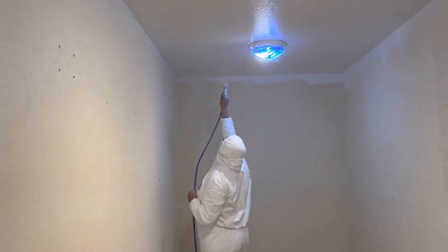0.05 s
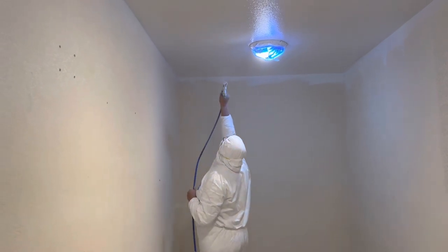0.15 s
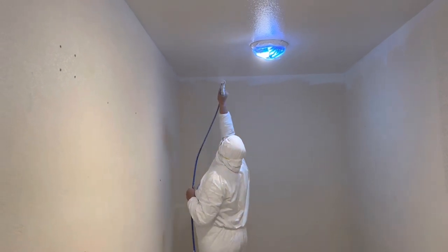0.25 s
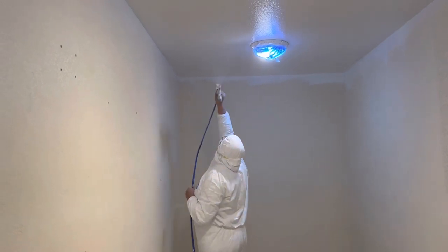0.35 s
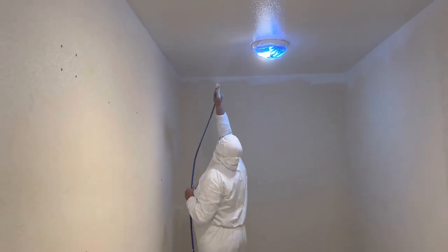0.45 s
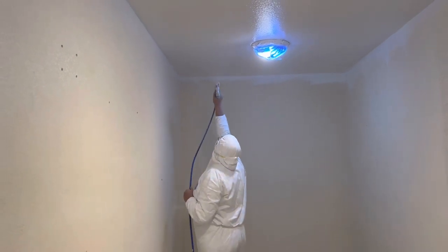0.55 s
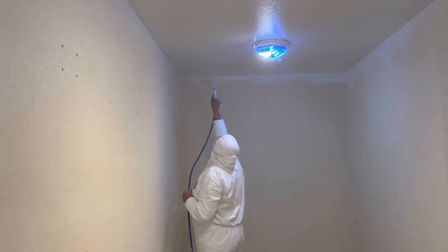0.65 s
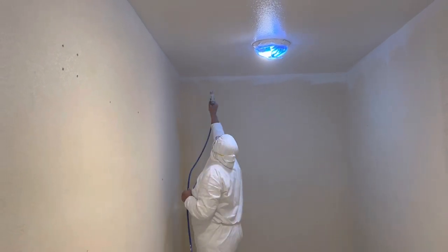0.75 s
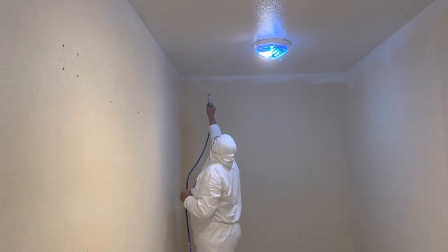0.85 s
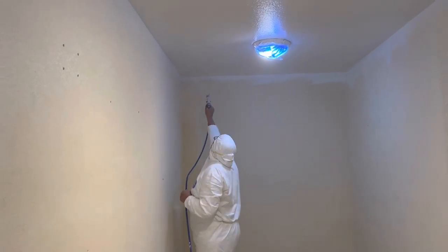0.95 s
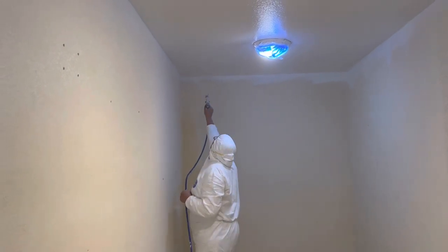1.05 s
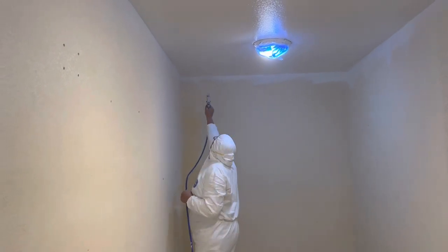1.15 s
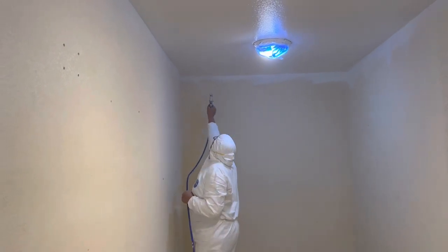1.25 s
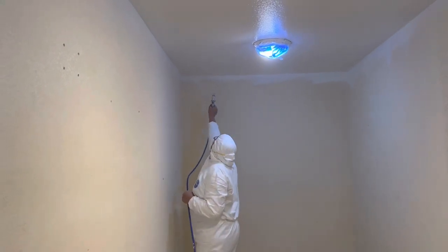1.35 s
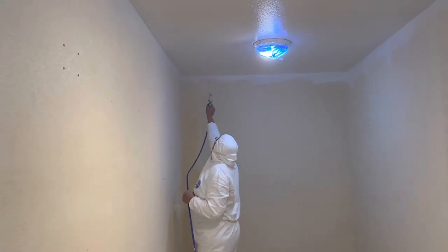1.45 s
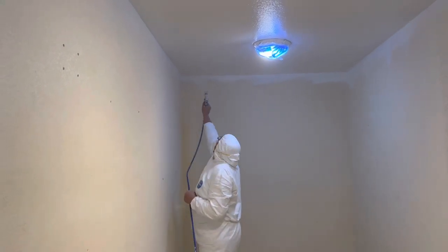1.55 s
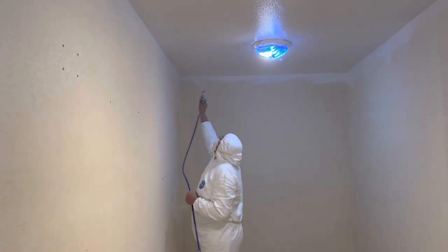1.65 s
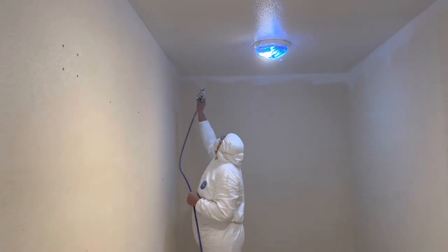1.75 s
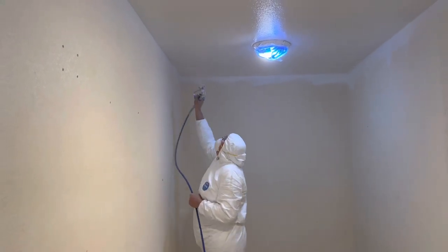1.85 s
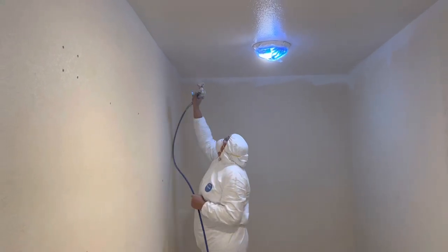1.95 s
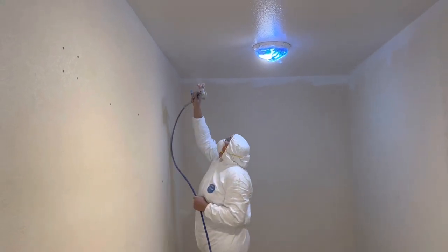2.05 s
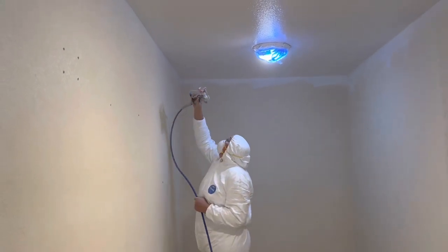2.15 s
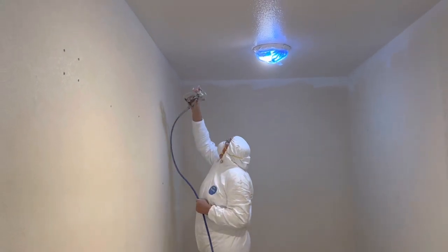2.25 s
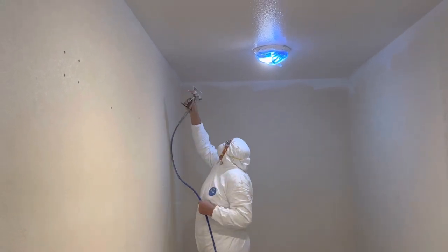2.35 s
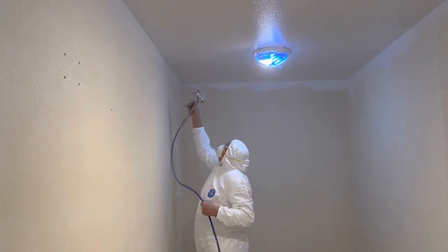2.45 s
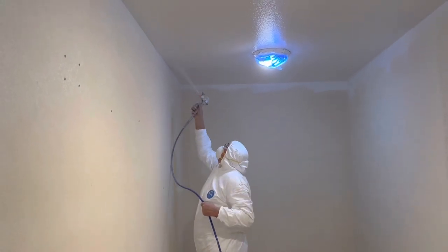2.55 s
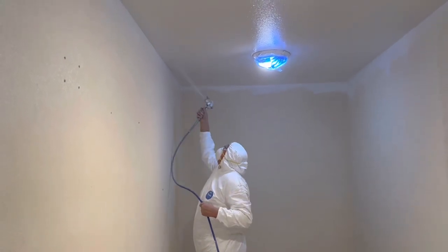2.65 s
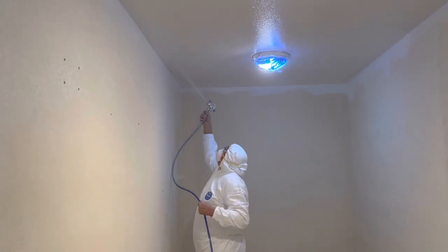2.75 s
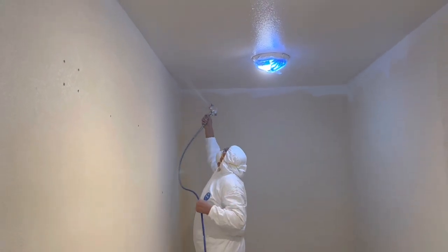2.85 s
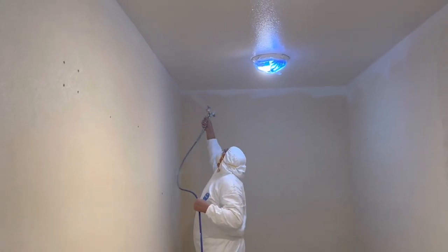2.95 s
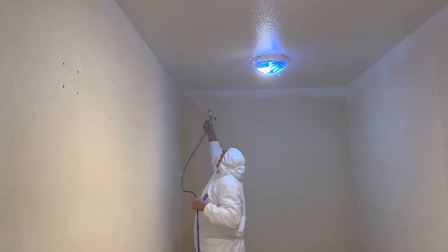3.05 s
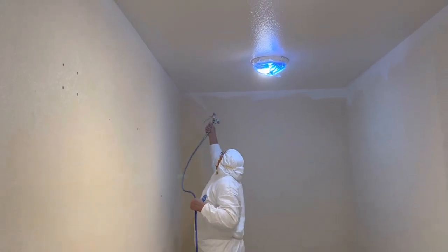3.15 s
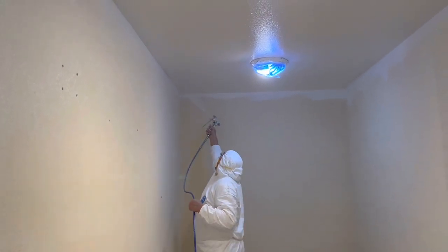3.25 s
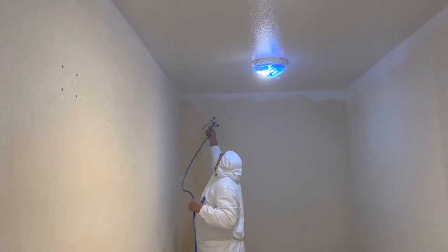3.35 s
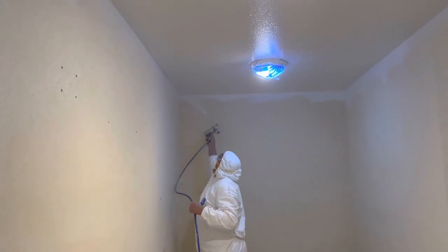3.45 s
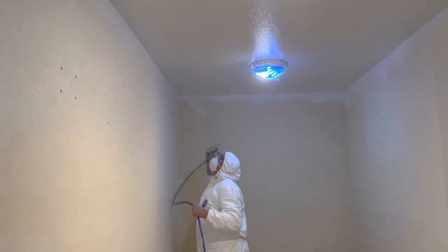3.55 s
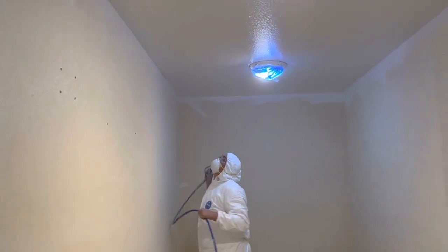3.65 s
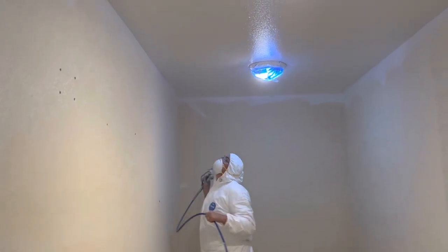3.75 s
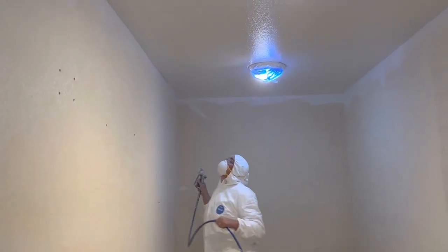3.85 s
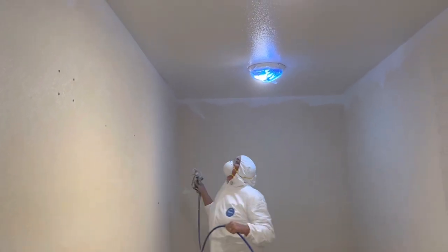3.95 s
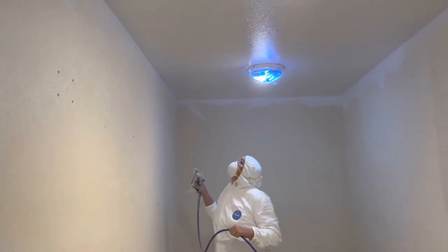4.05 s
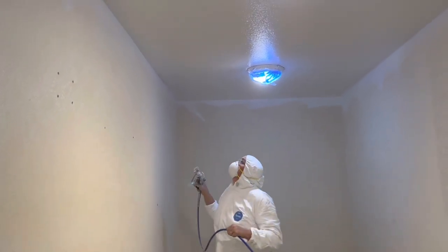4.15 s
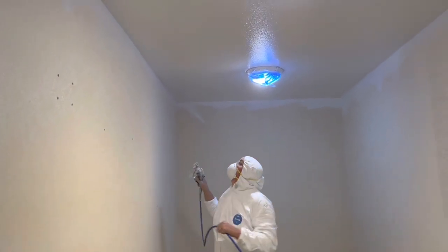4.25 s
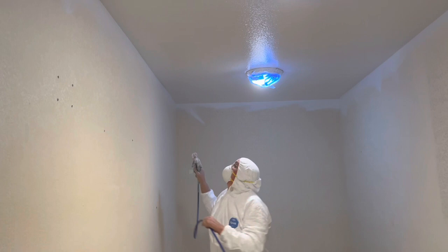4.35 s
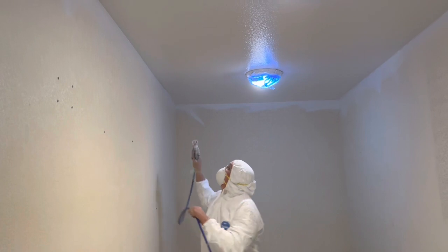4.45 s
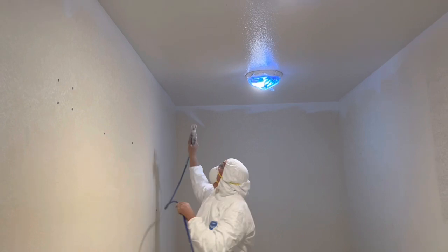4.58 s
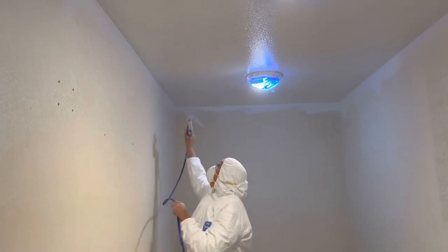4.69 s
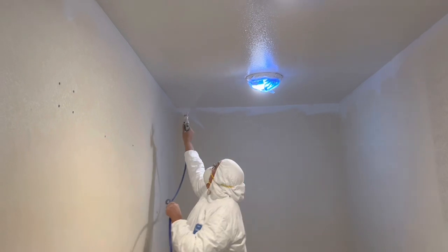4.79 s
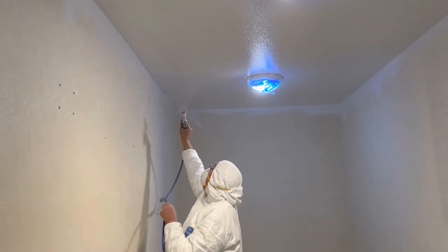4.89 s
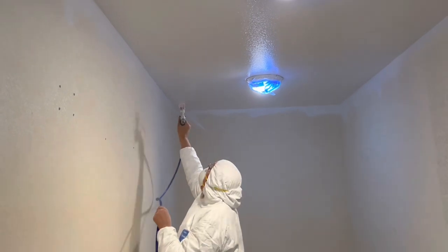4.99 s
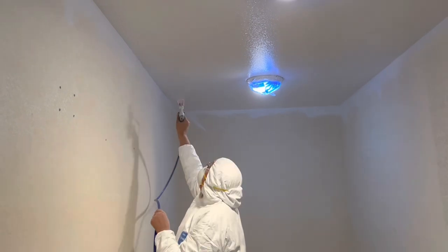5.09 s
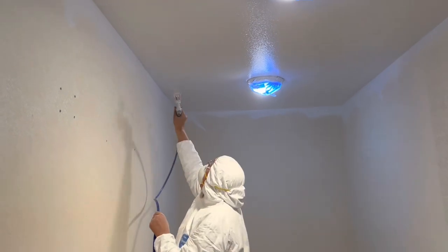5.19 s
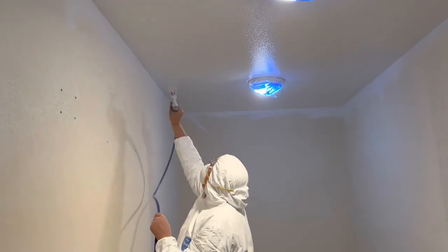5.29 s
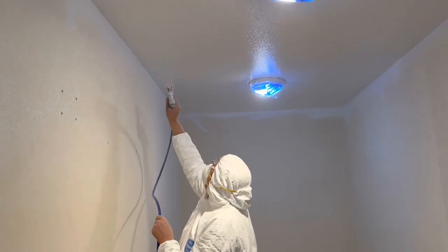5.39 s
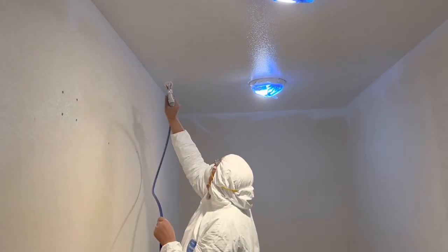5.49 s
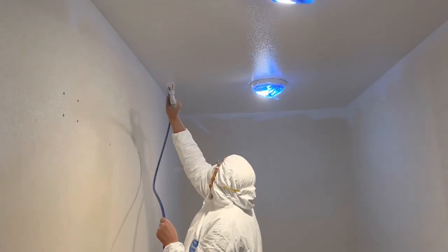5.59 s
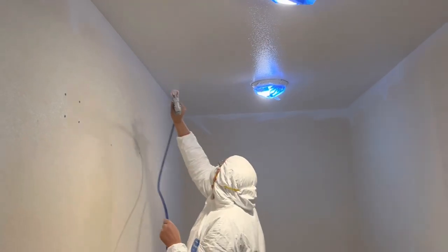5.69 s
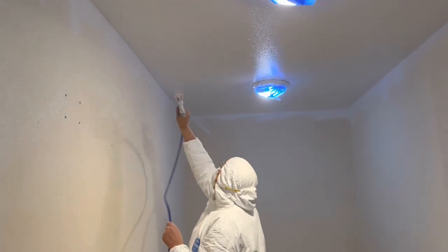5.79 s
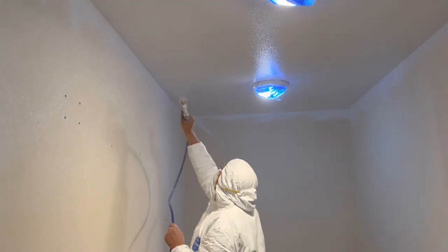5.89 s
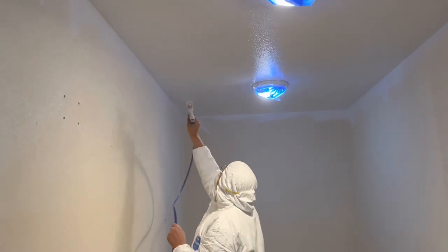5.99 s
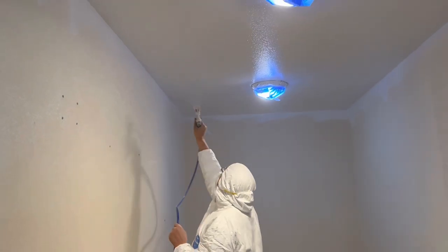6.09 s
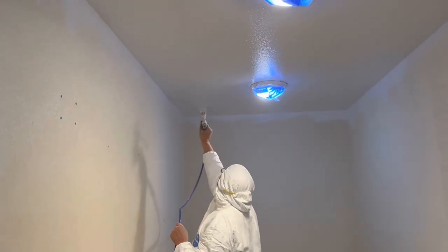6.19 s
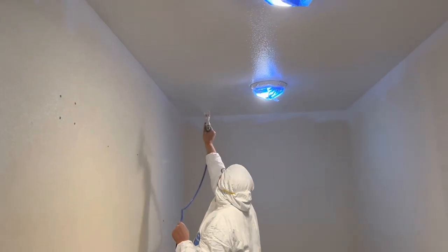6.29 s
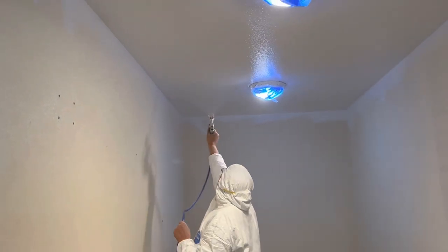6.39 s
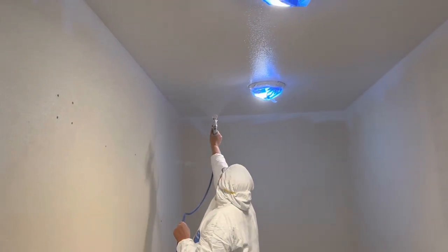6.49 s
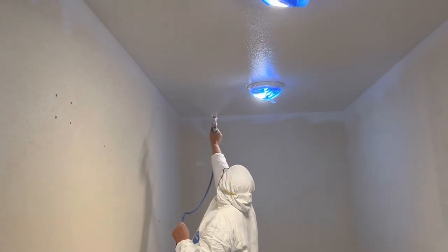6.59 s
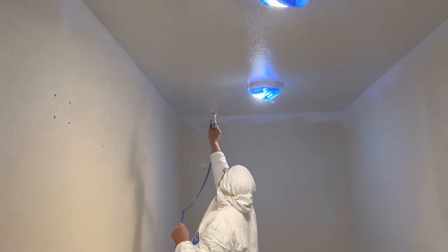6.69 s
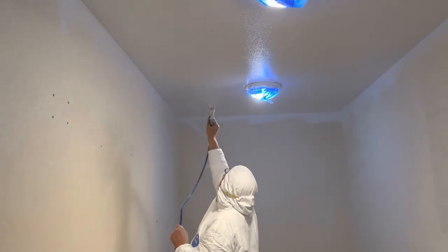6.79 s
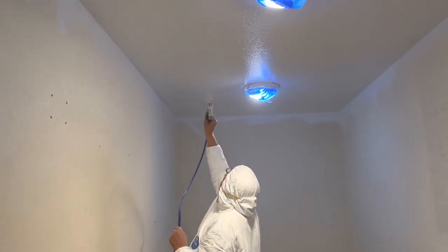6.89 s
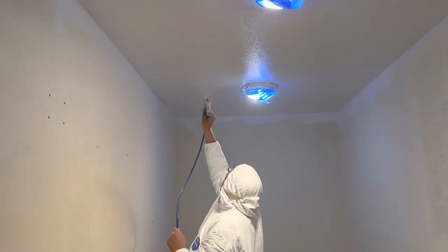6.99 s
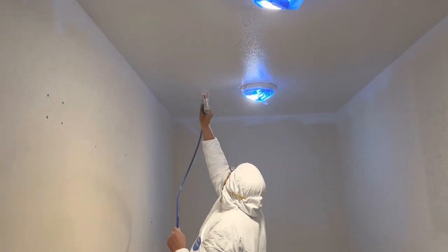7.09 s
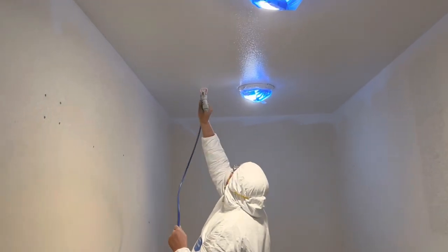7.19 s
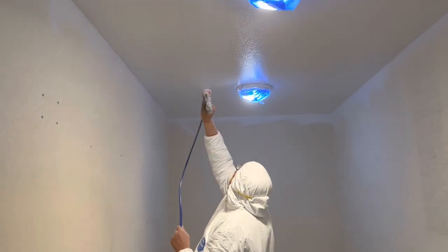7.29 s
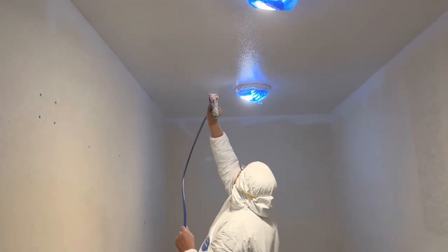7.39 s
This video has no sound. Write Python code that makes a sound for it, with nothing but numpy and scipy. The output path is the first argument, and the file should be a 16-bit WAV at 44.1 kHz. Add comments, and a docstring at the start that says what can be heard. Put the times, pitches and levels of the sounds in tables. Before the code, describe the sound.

Sharp airless spray hiss and a buzzing pump motor run indoors, cut out briefly twice as the trigger is released, then resume.

```python
"""Hiss first: an airless paint gun sprays a ceiling in a narrow bare room; the trigger is let go twice.
The jet is coloured noise; under it a pump motor cuts in when the pressure drops, hunts in speed and
runs down after each stop. The pump is a pattern of beats and gear noise, ringing its housing.
Behind: a distant machine hums as a set of sines and the painter's coverall rustles as swells of noise.
A few dull knocks are damped rings with puffs of noise; a spaced microphone pair hears it all."""
import sys
import numpy as np
from scipy import signal
from scipy.fft import rfft, irfft, next_fast_len
from scipy.io import wavfile
from scipy.ndimage import uniform_filter1d

SR = 44100
rng = np.random.default_rng(int(sys.argv[2]) if len(sys.argv) > 2 else 0)


def master(y):
    """Save y as 16-bit WAV."""
    cut = np.clip(np.atleast_2d(y).T, -1, 1)
    pcm = np.round(cut * 32767)  # scale
    wavfile.write(sys.argv[1], SR, pcm.astype(np.int16))


N = 327663
SIZE = next_fast_len(N + SR)   # transform length, with room for tails
FREQS = np.maximum(np.arange(SIZE // 2 + 1) * SR / SIZE, 1)
TIME = np.arange(N) / SR

# pump motor, switched on by the pressure drop: on_s, off_s
MOTOR_RUNS = [(-1, 2.2), (2.82, 3.5), (5.075, 9)]


def from_db(db):
    """dB to gain."""
    return 10 ** (np.asarray(db) / 20)


def rms_one(x):
    """Scale to rms 1."""
    return x / np.sqrt(np.mean(np.square(x)) + 1e-20)


def at_hz(points, hz):
    """Read a (Hz, value) table on a log frequency axis."""
    table_hz, values = np.transpose(points)
    return np.interp(np.log(hz), np.log(table_hz), values)


def drift(rate_hz):
    """Slow chance: noise at every 40th sample through a double one-pole low-pass; spread 1."""
    pole = np.exp(-80 * np.pi * rate_hz / SR)
    noise = rng.standard_normal(N // 40 + 2002)
    slow = signal.lfilter([1], [1, -2 * pole, pole * pole], noise)[2000:]
    return np.interp(np.arange(N) / 40, np.arange(len(slow)), rms_one(slow))


def swell(start_s, end_s):
    """Half a sine from start to end, silent outside."""
    return np.sin(np.pi * np.clip((TIME - start_s) / (end_s - start_s), 0, 1))


def pair(source, mid_db, side_db, width_db):
    """Colour two signals as sum and difference of the microphones; return left and right spectra."""
    # phase by which the left port leads, read through its sine: pitch_hz, lead_rad
    left_lead = [(0, -15), (520, 3.5), (780, 3), (1460, -10), (1720, -3), (4220, -7), (7240, 0.5),
                 (9730, 16), (10600, -2), (10900, -13), (12000, -9.2), (13400, -14), (14600, -14),
                 (16500, -12.6)]
    mid, side = rfft(source, SIZE)
    # spaced ports: part of the difference is the sum itself, a quarter cycle apart
    lean = 0.55 * np.sin(at_hz(np.add(left_lead, [1, 0]), FREQS))   # 1 Hz up, as log 0 has no value
    side = np.sqrt(np.clip(1 - lean ** 2, 0, 1)) * side + 1j * lean * mid
    # scaled so that each colour by itself leaves rms 1
    source_power = np.mean(abs(rfft(source[0], SIZE)) ** 2)
    mid_scale, side_scale = [np.sqrt(N / np.mean(from_db(db) ** 2) / source_power)
                             for db in (mid_db, side_db)]
    mid = mid_scale * mid * from_db(mid_db)
    side = side_scale * side * from_db(side_db + width_db)
    return np.array([mid + side, mid - side])


def by_octave(spectra, gain_db, patchy_db):
    """Overlapping octave bands, 125 Hz to 16 kHz, each with its own gain in time and its own flicker."""
    out, together = 0, drift(5.0)
    for octave in np.arange(-3, 5):   # counted from 1 kHz
        distance = abs(np.clip(np.log2(FREQS / 1000), -3, 4) - octave)
        share = np.clip(1 - distance, 0, 1)
        flicker_db = patchy_db * (0.37 * together + drift(21.5))
        band = irfft(spectra * share, SIZE)[:, :N]
        out = out + band * from_db(gain_db(octave) + flicker_db)
    return out


def background():
    """Multiples of a far machine's beat, each wavering in level, over steady room noise."""
    hum_hz, air_level_db = 23.72, -46.5
    # far machine: multiple, level_db (rms)
    hum_multiples = [(2, -64), (3, -56), (4, -52.5), (5, -54.5), (7, -54), (8, -79), (14, -62), (16, -73)]
    # room noise on the sum and the difference of the microphones: pitch_hz, density_db (per Hz)
    air_mid = [(18, -41), (30, -12), (165, -1.5), (221, -18.5), (336, -12), (426, -18.5), (554, -17.5),
               (3770, -36), (10500, -35), (11700, -47), (12600, -67), (14000, -43), (16000, -38)]
    air_side = [(18, -44), (30, -23), (161, 1.5), (415, -13), (569, -7), (666, -11), (866, -7), (4190, -24),
                (13000, -27), (16000, -64)]
    hum = np.zeros(N)
    for k, db in hum_multiples:
        tone = np.sin(2 * np.pi * (k * hum_hz * TIME + rng.random()))
        hum += from_db(db + 0.23 * drift(16.0)) * np.sqrt(2) * tone
    noise = rng.standard_normal((2, N))
    air = pair(noise, at_hz(air_mid, FREQS), at_hz(air_side, FREQS), width_db=-6.0)
    return hum + from_db(air_level_db) * irfft(air, SIZE)[:, :N]


def rustle():
    """Thin plastic cloth rubbing: swells of fine noise."""
    # coverall: peak_s, swell_s, fade_s, peak_db, tilt_db (per octave, about 5.7 kHz)
    rubs = [(4.06, .06, .1, -64, 3), (4.26, 0.052, 0.33, -50, -1), (4.351, 0.024, 0.17, -42, -6),
            (4.548, 0.045, 0.078, -42, -2.5)]
    # colour of the cloth: pitch_hz, density_db (per Hz)
    cloth_colour = [(470, -40), (800, -22), (1480, -11), (2110, -14.5), (3050, -11.5), (3810, -16),
                    (4760, -11), (11500, -4.5), (16000, -10)]
    drop_db = 12.5   # loss over one swell or fade time
    peak_s, swell_s, fade_s, peak_db, tilt_db = np.transpose(rubs)[:, :, None]
    away = np.maximum((peak_s - TIME) / swell_s, (TIME - peak_s) / fade_s)
    rub_db = peak_db - drop_db * away
    level_db = rub_db.max(axis=0)
    loudest_tilt_db = tilt_db[rub_db.argmax(axis=0), 0]
    colour = at_hz(cloth_colour, FREQS)
    noise = pair(rng.standard_normal((2, N)), colour, colour, width_db=-0.5)
    return by_octave(noise, lambda k: level_db + loudest_tilt_db * (k - 2.5), patchy_db=2.5)


def knocks():
    """A soft blow: a damped low ring with a puff of noise around its pitch."""
    # dull knocks: start_s, level_db, pitch_hz, t60_s
    blows = [(2.52, -35.5, 422, 0.21), (2.709, -35, 117, .08), (3.476, -17.5, 390, 0.087),
             (3.488, -23.5, 105, 0.13), (4.721, -22.5, 313, 0.06), (4.721, -36, 570, 0.095),
             (4.741, -30, 120, 0.074), (4.79, -31, 300, 0.084)]
    tail_db, tail_t60_s, attack_s = -17.5, 0.81, 0.0025
    out, t = np.zeros(N), np.arange(SR // 4) / SR
    for start_s, level_db, hz, t60_s in blows:
        band = signal.butter(2, [0.65 * hz, 2.2 * hz], "band", fs=SR, output="sos")
        puff = rms_one(signal.sosfilt(band, rng.standard_normal(len(t))))
        ring = np.sin(2 * np.pi * hz * t)
        blow = from_db(-60 * t / max(t60_s, 0.01)) * (0.52 * ring + 0.31 * puff)
        tail = from_db(tail_db - 60 * t / tail_t60_s) * puff   # the room answers
        at = round(start_s * SR)
        out[at:at + len(t)] += from_db(level_db) * (1 - np.exp(-t / attack_s)) * (blow + tail)
    return out


def whines():
    """The pump housing sings for a moment: a wavering tone that swells and fades."""
    # brief whines: start_s, end_s, pitch_hz, level_db (rms at the height of the swell)
    whine_rows = [(2.867, 2.954, 2010, -36), (3.662, 3.676, 1594, -25.5), (3.677, 3.903, 984, -38.5),
                  (5.272, 5.495, 1996, -37), (5.74, 5.87, 4220, -38), (6.167, 6.397, 815, -31.5)]
    out = np.zeros((2, N))
    channel_lead = np.array([[0], [0.2]])   # cycles, left and right
    for start_s, end_s, hz, db in whine_rows:
        cycles = hz * TIME + 0.17 * drift(21.0) + rng.random() + channel_lead
        out += from_db(db) * np.sqrt(2) * swell(start_s, end_s) * np.sin(2 * np.pi * cycles)
    return out


def motor():
    """The motor cuts in, spins up, hunts, and coasts once off; gives speeds, run-down and level."""
    # speed the motor strives for, hunting under load: time_s, speed_turns (per s)
    wanted_speed = [(0.0, 37.3), (0.17, 38.5), (0.35, 39.3), (0.55, 39.45), (0.72, 40.15), (0.88, 38.9),
                    (0.98, 37.6), (1.05, 36.2), (1.15, 35.45), (1.27, 35.8), (2.0, 35.9), (2.1, 36.7),
                    (2.2, 36.3), (2.8, 36), (2.82, 43.3), (3.3, 43.2), (3.42, 42.6), (3.6, 39.5),
                    (5.0, 43.5), (5.53, 43.5), (5.6, 43.2), (5.83, 40.6), (5.97, 32.5), (6.15, 31.9),
                    (6.24, 36.1), (6.32, 36.4), (6.47, 32.7), (6.64, 31.8), (6.78, 32.2), (6.86, 34.6),
                    (6.96, 34.5), (7.12, 33.1), (7.19, 33.2), (7.3, 33.9), (7.43, 33.5)]
    # each run as heard in the room at the usual speed: level_db
    run_level = [-25, -25, -22.5]
    crawl_turns = 15   # lowest speed, turns per s
    spin_up_s, coast_s, cut_in_s = 0.135, 0.45, 0.0011
    run_down_bend = 1.94   # how late the loss over the coast sets in
    on_s, off_s = np.transpose(MOTOR_RUNS)
    run = np.searchsorted(on_s, TIME) - 1
    running_s = TIME - on_s[run]
    coast = np.maximum(TIME - off_s[run], 0) / coast_s
    wanted = np.interp(TIME, *np.transpose(wanted_speed))
    driven = crawl_turns + (wanted - crawl_turns) * (1 - np.exp(-running_s / spin_up_s))
    speed = np.maximum(driven - (driven - crawl_turns) * coast ** 2, crawl_turns)
    level_db = np.take(run_level, run) + 20 * np.log10(1.001 - np.exp(-running_s / cut_in_s))
    return speed, driven, coast ** run_down_bend, level_db


def shaft_beats(turns, changing):
    """One rattle of contacts repeats every shaft turn; teeth mesh over it and single multiples sing out."""
    # strength of the multiples 6 to 35 of the shaft rate: level_db
    multiple_level = [5.5, 0.5, 0.5, 0.5, 3, -1.7, 4, 6.5, 3.3, 6.5, 4.5, 2.8, 3.5, 4, 3, 2.5, -1.5, 2.5,
                      1.5, 3, 3.5, 1.5, -0.2, 3.2, 2.3, 3.2, 3.5, 5.5, -3, -1.5]
    # gear teeth meshing: multiple of the shaft rate, level_db (over a plain multiple)
    mesh_teeth = [(77, 4), (78, 8.5), (79, 5), (101, 6.5)]
    # by multiple of the shaft rate: start_s, end_s, level_db (peak, against all the beats together)
    singing_multiples = {"7": [(0.2, 0.64, -13.5)], "10": [(-0.02, 0.29, -14.5), (0.78, 1.07, -12),
                         (2.0, 2.3, -16)], "12": [(0.25, 0.7, -18), (5.42, 5.8, -19)],
                         "13": [(0.15, 0.62, -22)], "16": [(0.3, 0.9, -18)], "18": [(5.45, 5.75, -18)],
                         "24": [(5.3, 5.7, -15)], "15": [(1.02, 2.15, -17), (3.2, 3.47, -19),
                         (5.42, 5.8, -16)], "22": [(3.15, 3.48, -8), (5.38, 5.84, -8)],
                         "26": [(1.1, 2.15, -17)], "33": [(1.1, 2.15, -22)], "54": [(5.48, 5.73, -7)],
                         "77": [(1.05, 2.1, -6)]}
    unsteady_db, unsteadiest_db = 0.3, 4.5   # loss per turn per s per s of speed change, and at most
    multiples = np.exp(2j * np.pi * rng.random((2, 121)))
    multiples[:, 6:36] *= from_db(multiple_level)
    shapes = irfft(multiples, 4096)   # one turn each
    beats = np.array([np.interp(turns % 1, np.arange(4096) / 4096, shape) for shape in shapes])
    for k, db in mesh_teeth:
        flicker_db = 4 * drift(12)   # the teeth come and go
        tone = np.sin(2 * np.pi * (k * turns + rng.random((2, 1))))
        beats = beats + from_db(db + flicker_db) / 2048 * tone   # 1/2048: one plain multiple
    beats = rms_one(beats)
    direct = beats * from_db(-np.minimum(unsteady_db * changing, unsteadiest_db))
    for multiple, rows in singing_multiples.items():
        k = int(multiple)
        tone = np.cos(2 * np.pi * k * turns + np.angle(multiples[:, k, None]))
        direct = direct + sum(from_db(db) * swell(start, end) for start, end, db in rows) * tone
    return beats, direct


def housing_colour_db():
    """The pump housing rings at its resonances and hardly passes other pitches on."""
    # resonances: pitch_hz, width_hz, level_db
    resonances = [(268.4, 6.5, 4.5), (376.2, 5.2, 17.5), (478, 9.1, 6.5), (502, 4.4, -2), (542, 1.6, 13.5),
                  (645, 11.7, 6), (804.4, 9.6, 10), (910, 15.5, 11), (991.5, 14, 9), (1185, 22, 4.5),
                  (1441, 41, 2.5), (1548, 6.3, 2), (2013, 11.6, 1), (2260, 12, -8.5), (2754, 23, -13.5),
                  (3320, 100, -15.5)]
    # dips in what gets through (negative depth lifts): pitch_hz, width_hz, depth_db
    dead_spots = [(301, 19, 1.5), (349, 7.6, 3.5), (586, 14, 1.5), (766, 18, -1), (885, 25, 6.5)]
    gain = from_db(-10.5)   # what passes between the resonances
    for hz, width_hz, db in resonances:
        gain = gain + from_db(db) / np.hypot(1, 2 * (FREQS - hz) / width_hz)
    colour_db = 20 * np.log10(gain)
    for hz, width_hz, depth_db in dead_spots:
        colour_db = colour_db - depth_db / (1 + (2 * (FREQS - hz) / width_hz) ** 2)
    return colour_db


def pump():
    """Shaft beats and gear noise ring the housing; the room smears the beats."""
    # pump colour on the sum and the difference of the microphones: pitch_hz, density_db (per Hz)
    pump_mid = [(120, -10), (200, -21.5), (329, -2), (371, -9), (569, -10), (935, -8.5), (2400, -7),
                (4220, -17), (8090, -22.5), (12000, -24.5), (15600, -72), (22000, -120)]
    pump_side = [(120, -57), (200, -7), (371, -14), (589, -8.5), (951, -2), (1070, -4.5), (2200, 1.5),
                 (4440, -15), (7950, -13), (12000, -25), (15600, -62), (22000, -120)]
    # colour of the gear noise: pitch_hz, gain_db
    gear_colour = [(200, -9), (700, -10), (1500, -2), (5000, 3)]
    # brightness of each run: tilt_db (per octave about 1 kHz)
    run_tilt = [1.08, 0.67, 0.74]
    # gain per turn per s above the usual speed: pitch_hz, gain_db
    louder = [(250, 0.48), (500, 1), (1000, 0.35), (2000, 0.93), (4000, 1.5)]
    # loss over the coast: pitch_hz, loss_db
    run_down = [(250, 18), (500, 29), (1000, 23), (2000, 30.5), (4000, 53.5)]
    # further loss per turn per s below the sluggish speed, the bass above all: pitch_hz, loss_db
    sluggish = [(250, 0.98), (500, 0.14), (1000, 0.02), (2000, 0.055), (4000, .1)]
    usual_turns, sluggish_turns, jitter = 36, 21, 0.0025   # turns per s; share of the speed
    room_db, room_t60_s = -6, 0.7   # the room's answer to the beats, against their rms
    rough_base_db, roughest_db, smoother_db = 11.5, 14, 0.9   # gear noise; its fall per turn per s

    speed, driven, coast, level_db = motor()
    turns = np.cumsum(speed * (1 + jitter * drift(12.9))) / SR
    changing = uniform_filter1d(abs(np.gradient(speed)) * SR, size=4000)   # turns per s per s
    beats, direct = shaft_beats(turns, changing)
    echoes = rng.standard_normal((2, SR // 2)) * from_db(-60 * TIME[:SR // 2] / room_t60_s)
    smeared = rms_one(signal.fftconvolve(beats, echoes, axes=1)[:, :N])
    gear_spectra = rfft(rng.standard_normal((2, N)), SIZE) * from_db(at_hz(gear_colour, FREQS))
    gears = irfft(gear_spectra, SIZE)[:, :N]
    # the faster the shaft, the deeper the gear noise sinks under the beats
    rough_db = np.minimum(rough_base_db - smoother_db * (speed - usual_turns), roughest_db)
    rattle = direct + from_db(room_db) * smeared + from_db(rough_db) * gears

    housing_db = housing_colour_db()
    mid_db, side_db = at_hz(pump_mid, FREQS) + housing_db, at_hz(pump_side, FREQS) + housing_db
    sound = pair(rattle, mid_db, side_db, width_db=1.0)
    tilt_db = np.take(run_tilt, np.searchsorted(np.transpose(MOTOR_RUNS)[0], TIME) - 1)
    too_slow = np.maximum(sluggish_turns - driven, 0)

    def octave_db(k):
        """Level of one octave as speed and run-down set it."""
        hz = 1000 * 2.0 ** k
        speed_db = at_hz(louder, hz) * (driven - usual_turns) - at_hz(sluggish, hz) * too_slow
        return level_db + tilt_db * k + speed_db - at_hz(run_down, hz) * coast
    return by_octave(sound, octave_db, patchy_db=1.35)


def jet():
    """Paint tearing into mist: bright noise that fills the room fast and dies in it octave by octave."""
    # trigger held: opens_s, closes_s
    trigger_pulls = [(-1, 2.1), (2.524, 3.4), (4.717, 9)]
    # each pull, as the gun moves nearer or away: start_level_db, drift_db (per s)
    pull_levels = [(-21.5, -0.72), (-23.5, -1.1), (-21, -0.5)]
    # jet colour on the sum and the difference of the microphones: pitch_hz, density_db (per Hz)
    jet_mid = [(180, -18.5), (300, -18.5), (730, -17), (1100, -19.5), (1900, -17), (3770, -17.5),
               (5500, -12.5), (8000, -5), (10700, -2.5), (12000, -8), (13700, -3), (14900, 3.5),
               (15800, -0.5)]
    jet_side = [(180, -55), (300, -34), (730, -19), (1360, -20), (1870, -15), (4310, -15.5), (4850, -15),
                (7020, -7), (9000, -3), (10800, -6.5), (13000, -2.5), (16000, -2.5)]
    # room decay once the jet stops: pitch_hz, t60_s
    room_decay = [(500, 0.55), (4000, 0.11), (8000, 0.58), (16000, 0.053)]
    fill_s = 0.0082   # the room fills with hiss
    opens_s, closes_s = np.transpose(trigger_pulls)
    pull = np.searchsorted(opens_s, TIME) - 1
    start_db, drift_db = np.transpose(pull_levels)[:, pull]
    held_s = TIME - opens_s[pull]
    since_stop_s = np.maximum(TIME - closes_s[pull], 0)
    level_db = start_db + drift_db * held_s + 20 * np.log10(1.001 - np.exp(-held_s / fill_s))
    noise = rng.standard_normal((2, N))
    hiss = pair(noise, at_hz(jet_mid, FREQS), at_hz(jet_side, FREQS), width_db=-2.0)

    def octave_db(k):
        """Level of one octave, falling 60 dB in its own decay time after the trigger closes."""
        return level_db - 60 * since_stop_s / at_hz(room_decay, 1000 * 2.0 ** k)
    return by_octave(hiss, octave_db, patchy_db=1.17)


def scene():
    """All sources in the room, from the far machine to the gun."""
    return background() + rustle() + knocks() + whines() + pump() + jet()


def record(dry):
    """Two capsules differ in colour; sum and difference are shaped in the treble; deep bass and top are cut."""
    # left capsule over right: pitch_hz, level_db
    left_over_right = [(60, -4.5), (110, 2.5), (200, -4), (380, -5), (700, -3.5), (1290, -2.5), (2380, -.5),
                       (4400, 1.5), (8120, 4.5), (11500, -1)]
    # gain on the sum and on the difference of the channels: pitch_hz, gain_db
    sum_gain = [(11600, 2), (12350, -23), (12500, -33), (13050, -35), (13200, -17), (13800, 2)]
    difference_gain = [(14400, 0.5), (14600, -22), (16000, -22)]
    bass_cut_hz, cutoff_hz = 42, 15750
    capsule_db = np.outer([0.5, -0.5], at_hz(left_over_right, FREQS))
    left, right = rfft(dry, SIZE) * from_db(capsule_db)
    mid = (left + right) / 2 * from_db(at_hz(sum_gain, FREQS))
    side = (left - right) / 2 * from_db(at_hz(difference_gain, FREQS))
    spectra = np.array([mid + side, mid - side]) / np.hypot(1, (bass_cut_hz / FREQS) ** 8)
    top_cut = signal.ellip(12, 0.5, 70, cutoff_hz, fs=SR, output="sos")
    return signal.sosfilt(top_cut, irfft(spectra, SIZE)[:, :N])


dry = scene()
out = record(dry)
master(out)
```